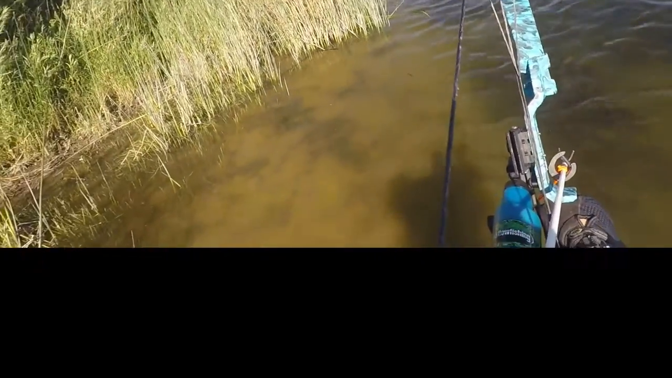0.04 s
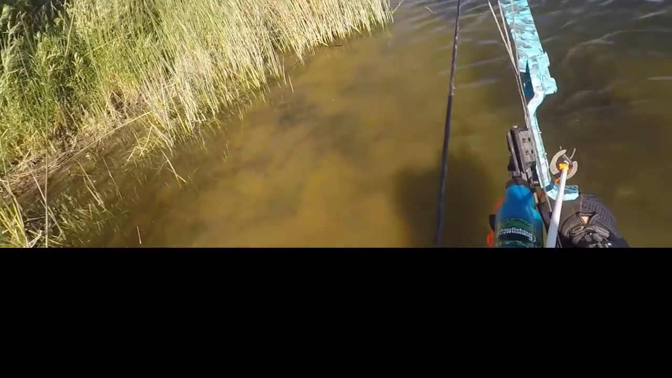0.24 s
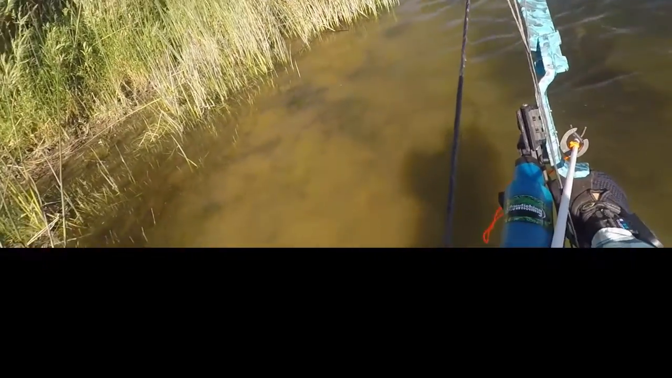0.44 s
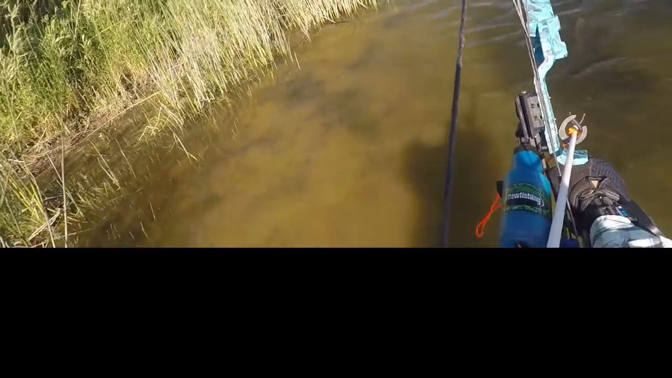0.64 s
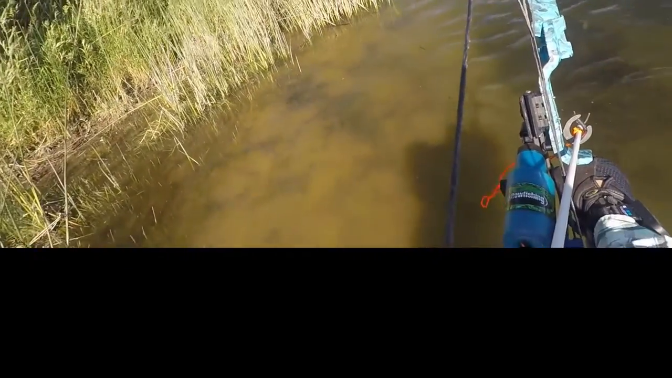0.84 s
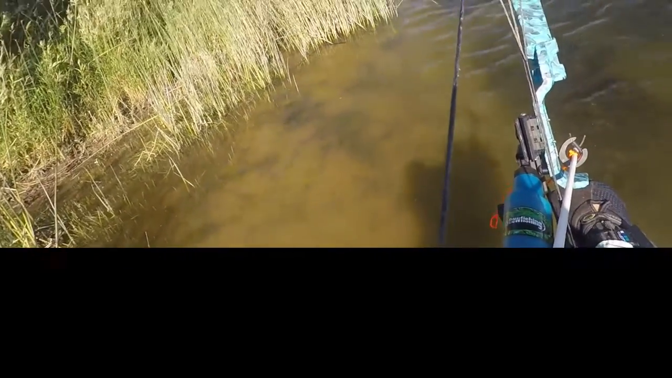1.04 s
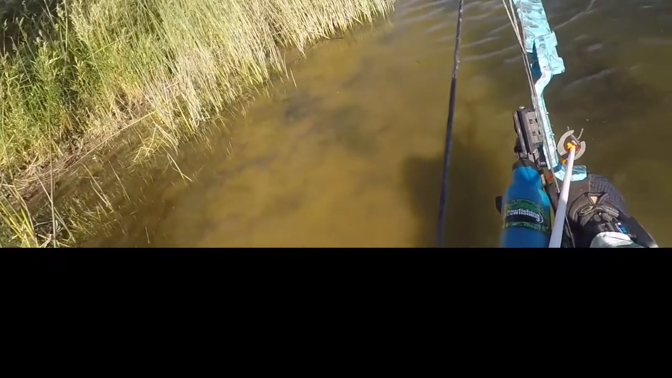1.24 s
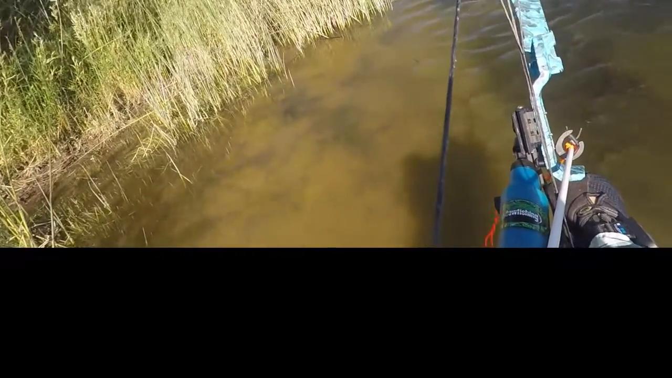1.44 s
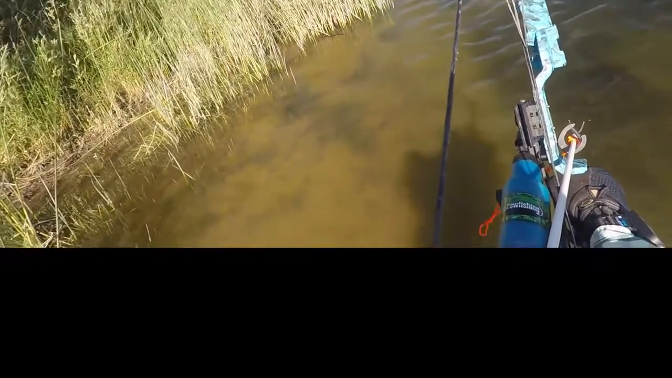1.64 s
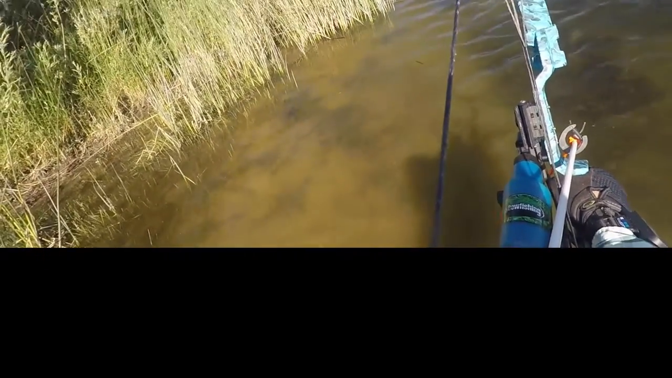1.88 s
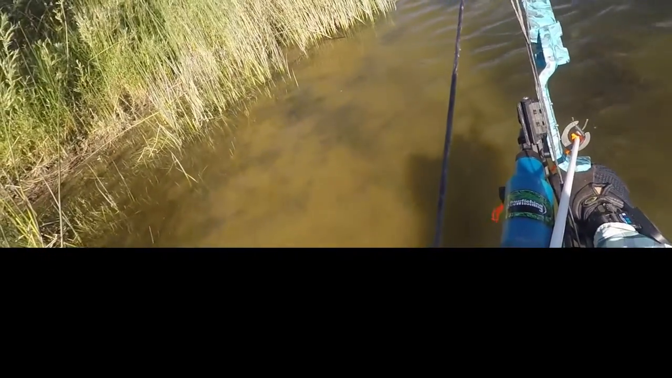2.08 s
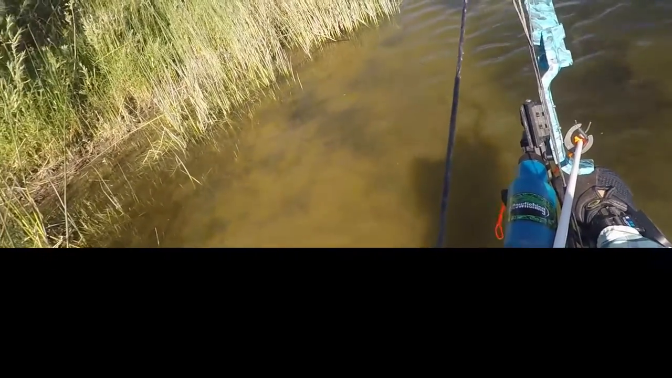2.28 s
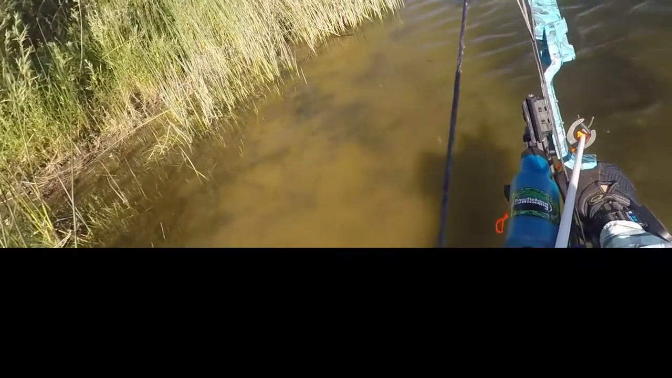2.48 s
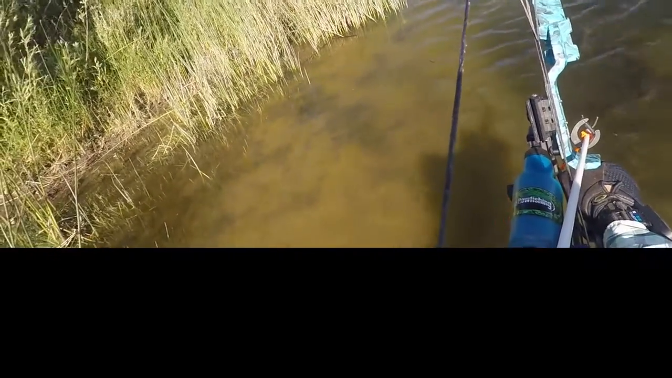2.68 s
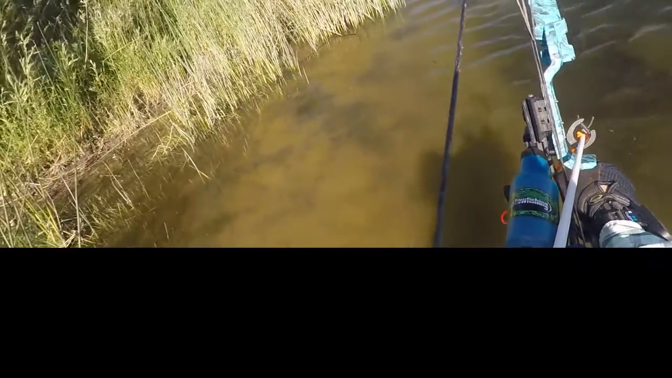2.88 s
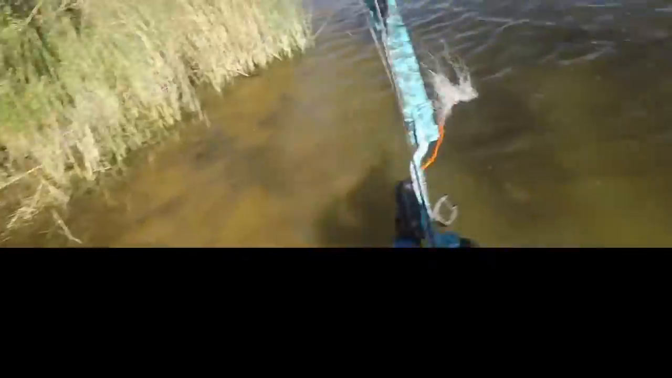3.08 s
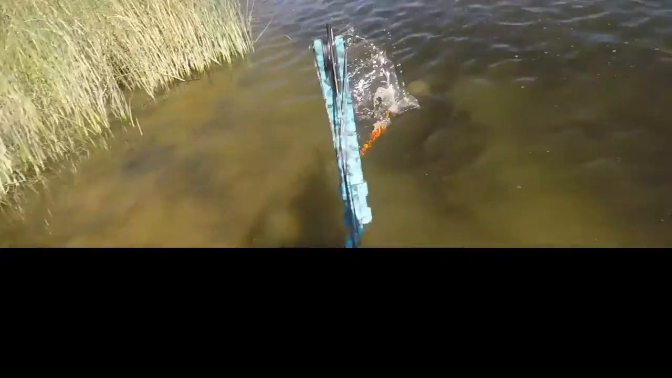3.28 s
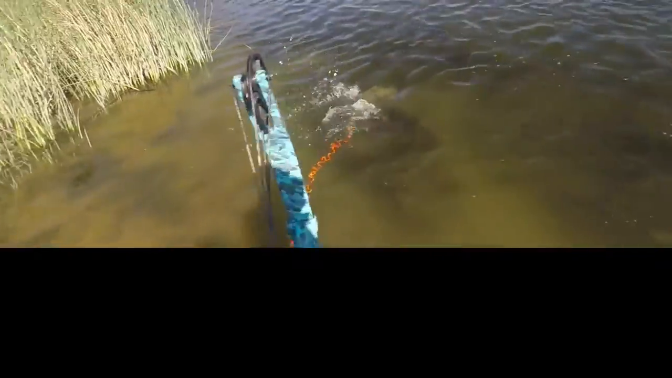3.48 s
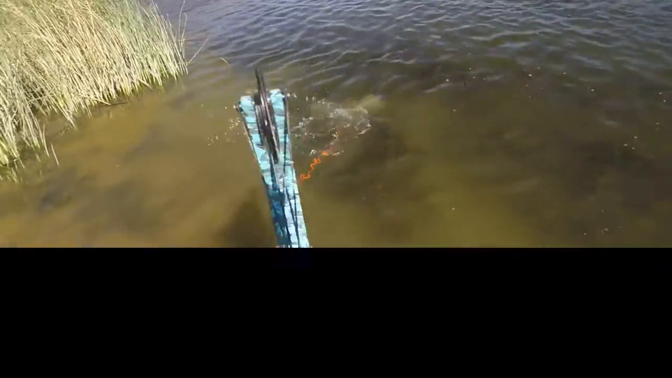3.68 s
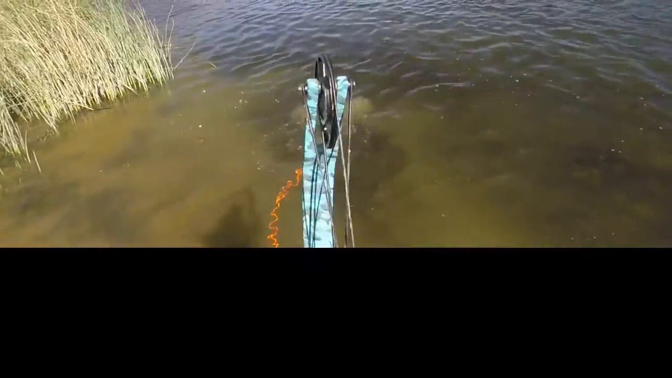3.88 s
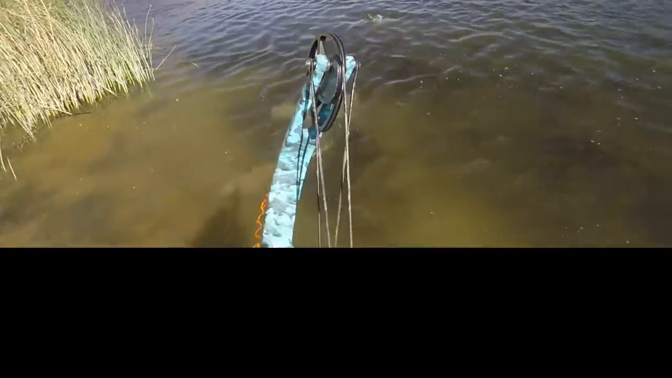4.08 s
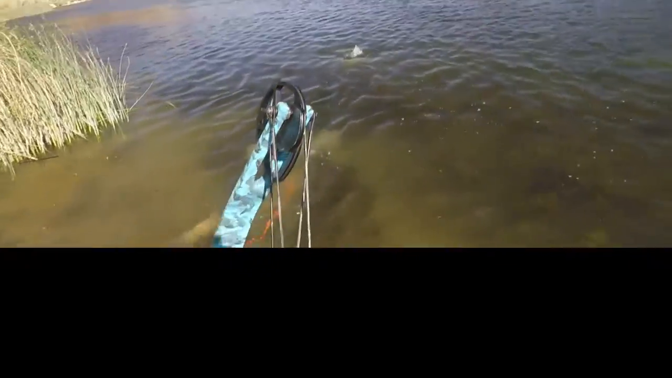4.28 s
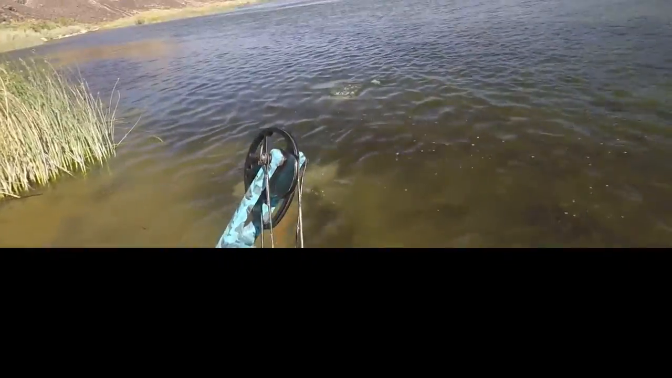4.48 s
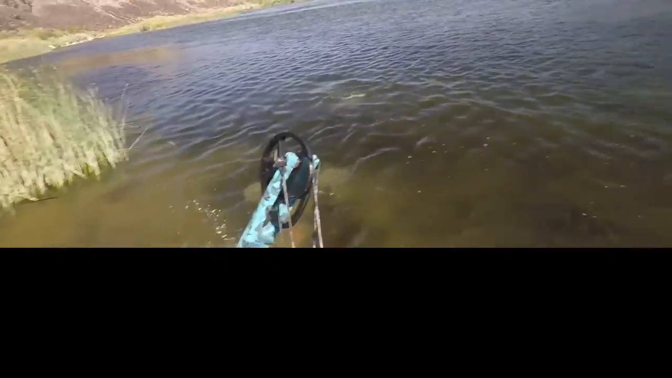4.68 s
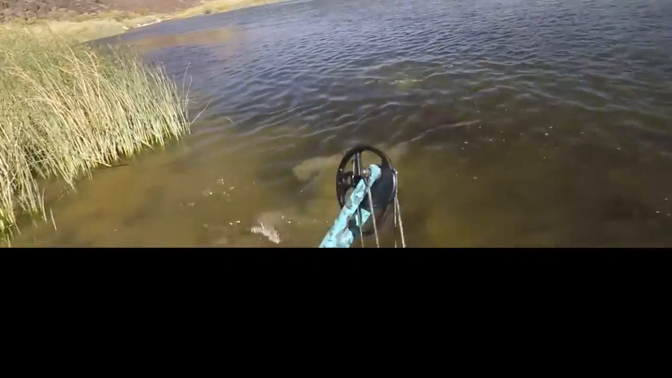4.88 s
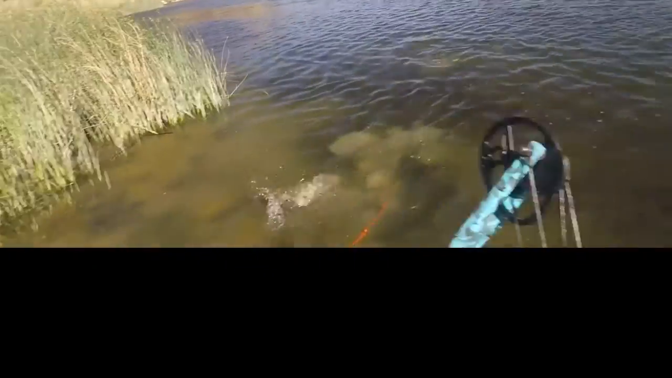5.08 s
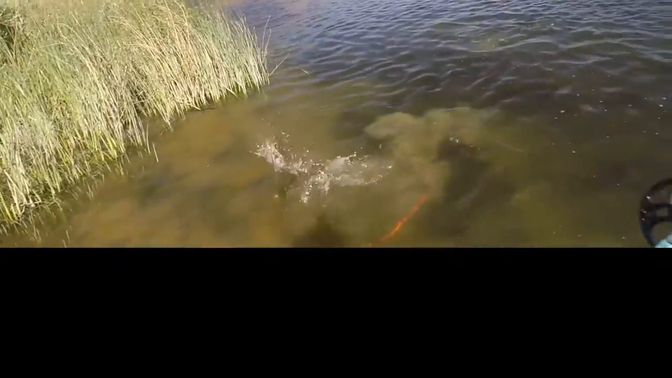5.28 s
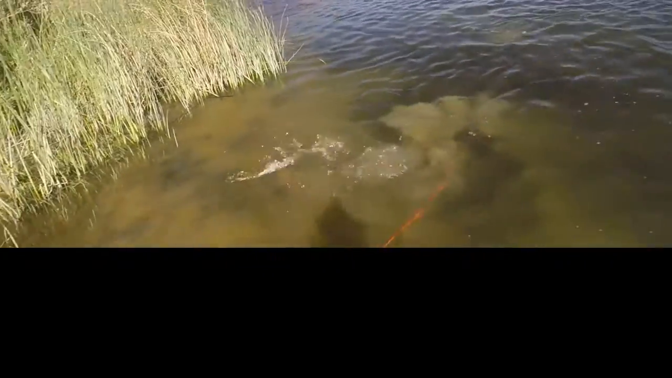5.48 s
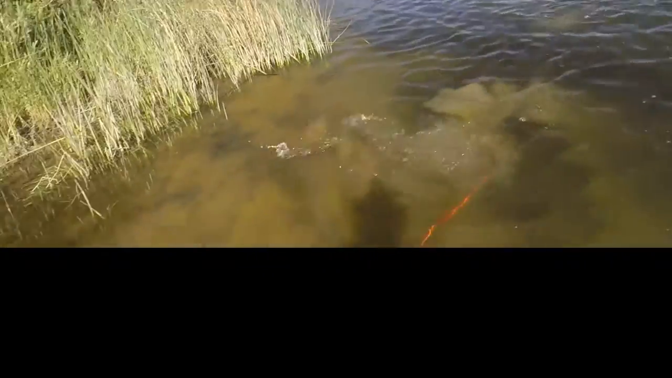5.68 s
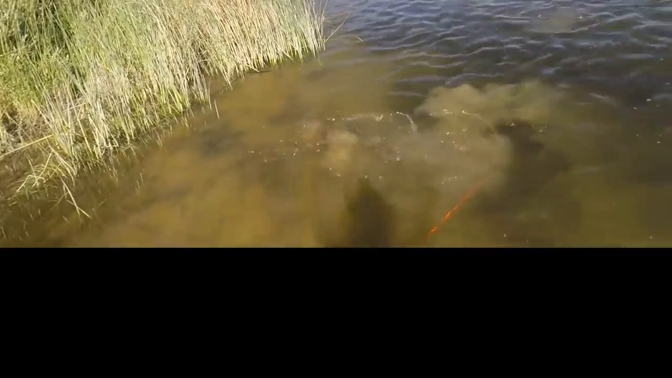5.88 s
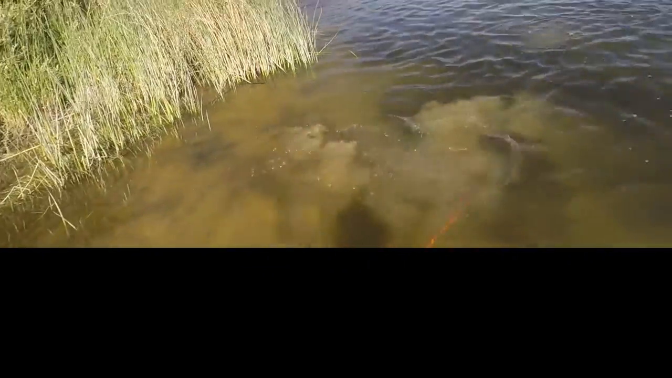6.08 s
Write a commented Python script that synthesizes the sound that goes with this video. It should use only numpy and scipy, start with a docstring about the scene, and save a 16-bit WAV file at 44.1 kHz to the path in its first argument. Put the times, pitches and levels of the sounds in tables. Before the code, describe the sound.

Wind rumbles steadily on a body-worn microphone at a reedy bank, with faint ticks of gear. A small bird chips, whistles a thin note and chatters quietly. Halfway through, a compound bow fires close by with a loud, sharp clack and a deep thump, a brief shudder and a zip of line. Soft splashes and drops follow in the shallows, and the water trickles and laps under the wind.

```python
"""A compound bow is shot into the shallows from a reedy bank, heard from a camera worn by the archer.
Wind rumbles on the microphone throughout, and the archer's gear ticks. From 1.3 s a bird chips,
whistles and chatters in the reeds. At 3 s the string snaps forward: the recoil swings the camera,
line zips out after the arrow, and the bow clacks and shudders. Spray falls back in slaps and drops,
and from 4.5 s the water is churned up near the bank, trickling and lapping to the end."""
import sys
import numpy as np
from scipy import signal
from scipy.fft import rfft, irfft
from scipy.io import wavfile

SR = 44100
rng = np.random.default_rng(int(sys.argv[2]) if len(sys.argv) > 2 else 0)


def inscribe(sig):
    """Save sig as 16-bit PCM at rate SR to the path in sys.argv[1].

    A 1-D sig is mono; a 2-D sig holds one channel per row.
    Samples are clipped to [-1, 1] before scaling.
    """
    pcm = np.round(np.clip(np.atleast_2d(sig).T, -1, 1) * 32767)
    wavfile.write(sys.argv[1], SR, pcm.astype(np.int16))


N = 270814
T = np.arange(N) / SR


def from_db(db):
    return 10 ** (np.asarray(db) / 20)


def rms_one(x):
    return x / np.sqrt(np.mean(x ** 2) + 1e-20)


def phase_of(hz):
    return 2 * np.pi * np.cumsum(hz) / SR


def automation(rows):
    """One curve per column, ramping between timed breakpoints."""
    times, *columns = np.transpose(rows)
    return [np.interp(T, times, column) for column in columns]


def fade(age, t60):
    """A decay that starts at age 0."""
    return (age >= 0) * np.exp(-np.log(1000) * np.clip(age / t60, 0, 10))


def envelope(start_s, attack_s, t60, hold_s=0):
    """A smooth attack, a hold and a decay."""
    rise = np.sin(np.pi / 2 * np.clip((T - start_s) / attack_s, 0, 1)) ** 2
    return rise * fade(np.maximum(T - start_s - attack_s - hold_s, 0), t60)


def drift(rate_hz):
    """A smooth random modulator; rms 1."""
    hz = np.arange(N // 2 + 1) * SR / N
    return rms_one(irfft(rfft(rng.standard_normal(N)) / (1 + (hz / rate_hz) ** 2), N))


def equalise(x, curve):
    """Apply an EQ curve that rolls off beyond its ends; rms 1."""
    hz = np.maximum(np.arange(N // 2 + 1) * SR / N, 1)
    points, db = np.transpose(curve)
    skirts = np.minimum(1, np.minimum(hz / points[0], points[-1] / hz)) ** 3
    gain = from_db(np.interp(np.log(hz), np.log(points), db))
    return rms_one(irfft(rfft(x) * skirts * gain, N))


def noise(curve):
    return equalise(rng.standard_normal(N), curve)


def grains(per_s, spread_db):
    """Random clicks of uneven size."""
    sizes = from_db(spread_db * np.minimum(rng.exponential(1, N), 4))
    return sizes * rng.choice([-1, 1], N) * (rng.random(N) < per_s / SR)


def pole_pair(hz, width_hz):
    r = np.exp(-np.pi * width_hz / SR)
    return np.array([1, -2 * r * np.cos(2 * np.pi * hz / SR), r * r])


def resonance(x, hz, width_hz):
    """A two-pole band-pass with unity gain at its peak."""
    poles = pole_pair(hz, width_hz)
    return signal.lfilter(np.array([1, 0, -1]) * (1 - poles[2]) / 2, poles, x)


def small_hit(start_s, peak_db, hz, t60, breadth, size=16384):
    """A noise burst around one pitch; longer ones also have a softer attack."""
    out, age = np.zeros(N + size), np.arange(size) / SR
    burst = rng.standard_normal(size) * (fade(age, t60) - fade(age, t60 / 10))
    hit = resonance(resonance(burst, hz, breadth * hz), hz, 2 * breadth * hz)
    start = int(start_s * SR)
    out[start:start + size] = from_db(peak_db) * hit / np.abs(hit).max()
    return out[:N]


# resonances of the camera case: f/Hz, width/Hz, boost/dB
CASE_PEAKS = [(920, 87, 7), (1503, 57, 4), (1983, 67, 4.5), (2155, 69, 6.5), (3510, 52, 4.5),
              (4240, 110, 2.5), (5440, 200, 7.5), (6740, 320, 2.5)]

def in_case(x, depth=1):
    """The camera case rings along and colours the sound."""
    return x + depth * sum((from_db(db) - 1) * resonance(x, hz, width) for hz, width, db in CASE_PEAKS)


# wind strength, easing as the archer lowers the bow: t/s, level/dB
WIND_STRENGTH = [(0, 0), (0.9, -1.1), (1.75, -2), (2.4, -1), (3.3, -0.5), (3.65, -4.5), (4.5, -4.5),
                 (5.3, -3), (5.7, -5), (6.14, -3)]
# gusts that buffet the microphone: t/s, boost/dB
GUSTS = [(0.15, 2.5), (1.14, 4.5), (3.3, 11), (3.92, 5.5), (4.8, 9.5)]
# EQ of the deep rumble, the smaller eddies and the airy bed: f/Hz, level/dB
RUMBLE_EQ = [(15, 6.5), (30, 1), (42, -2), (60, -10), (90, -28.5)]
EDDY_EQ = [(60, -3.5), (85, 1), (115, -6.5), (150, -11.5), (240, -14.5), (310, -26.5), (480, -31)]
AIR_EQ = [(200, 3), (480, -0.5), (880, -2), (1120, -3.5), (1500, -1.5), (1750, -4), (2200, -3.5),
          (2500, -7.5), (4000, -9.5), (5500, -12.5), (8000, -16.5), (12000, -17), (15500, -22.5)]

def wind():
    """Lumpy rumble on the microphone over the even rustle of reeds and ripples."""
    strength_db, = automation(WIND_STRENGTH)
    gust_db = sum(db * np.exp(-((T - s) / 0.059) ** 2) for s, db in GUSTS)
    rumble = noise(RUMBLE_EQ) * from_db(-37 + strength_db + gust_db)
    eddies = noise(EDDY_EQ) * from_db(-51.5 + 1.32 * strength_db + 0.083 * gust_db + 1.7 * drift(4.8))
    air = rms_one(in_case(noise(AIR_EQ), depth=0.54))
    low_air = signal.sosfilt(signal.butter(1, 2000, fs=SR, output="sos"), air)
    # the rustle rides the breeze, the top hiss stays level
    rustle = low_air * from_db(-60 + 0.76 * strength_db + 0.74 * drift(23))
    hiss = (air - low_air) * from_db(-62.5)
    return rumble + eddies + rustle + hiss


# dull, close ticks and rubs: t/s, peak level/dB, f/Hz, t60/s
GEAR_TICKS = [(0.04, -51, 790, 0.33), (0.12, -49, 1380, 0.013), (0.529, -51, 1300, 0.017),
              (0.6015, -46, 1150, 0.027), (0.8, -53, 850, 0.18), (0.81, -44.5, 170, .12),
              (1.040, -42, 1310, 0.022), (2.372, -49, 1070, 0.08), (2.973, -45, 816, 0.081),
              (3.68, -55, 514, 0.014), (5.422, -57, 450, 0.01), (5.824, -54.5, 403, 0.011),
              (5.935, -53.5, 402, 0.013)]

def gear():
    """Bow, glove and clothes tick and rub as the archer moves."""
    ticks = sum(small_hit(s, db, hz, t60, breadth=0.41) for s, db, hz, t60 in GEAR_TICKS)
    return in_case(ticks, depth=0.1)


# chips and thin notes: t/s, length/s, first f/Hz, last f/Hz, level/dB, buzz/0-1
BIRD_NOTES = [(1.338, .025, 2900, 3100, -65, 0), (1.575, .022, 2900, 3220, -63, 0),
              (1.766, 0.0098, 2900, 3200, -58.5, 0), (1.893, 0.014, 6900, 5400, -61, 0),
              (2.524, 0.024, 5720, 5640, -58, 0), (2.513, .12, 8650, 8780, -71.5, 0),
              (2.552, 0.016, 3650, 3900, -55, 0.1), (2.557, .034, 3980, 3900, -47.5, 0.17),
              (2.582, .055, 4260, 4330, -59.5, 1), (2.582, .04, 3800, 3700, -59, 1),
              (2.767, 0.06, 7700, 7630, -64.5, 0)]

def bird_chips(buzz_hz=98, swing_hz=160):
    """Short glides from the reeds, some with a buzz that swings level and pitch together."""
    out = np.zeros(N)
    for s, length, first_hz, last_hz, db, buzz in BIRD_NOTES:
        progress = np.linspace(0, 1, int(length * SR))
        flutter = buzz * np.cos(2 * np.pi * buzz_hz * length * progress)
        pitch = first_hz + (last_hz - first_hz) * progress + swing_hz * flutter
        arch = np.sqrt(4 * progress * (1 - progress))
        start = int(s * SR)
        out[start:start + len(arch)] += from_db(db) * arch * (1 + flutter / 2) * np.sin(phase_of(pitch))
    return out


# pitch line of the whistle: t/s, upper voice f/Hz, gap down to the lower voice/Hz
WHISTLE_PITCH = [(1.945, 4120, 720), (1.97, 3960, 428), (2.003, 3953, 198), (2.04, 3950, 285),
                 (2.11, 3984, 323), (2.2, 4000, 312), (2.29, 3970, 343), (2.315, 3910, 300)]

def bird_whistle(start_s=1.94, length_s=0.376, attack_s=0.032, release_s=0.03, sag_db_per_s=7.5):
    """Two voices at once, the lower sliding up into place; their mixing adds a faint tone above."""
    age = T - start_s
    upper_hz, gap_hz = automation(WHISTLE_PITCH)
    upper = phase_of(upper_hz + 9 * drift(60))
    beat = phase_of(gap_hz + 14 * drift(40))
    voices = np.sin(upper) + from_db(-6.5) * np.sin(upper - beat) - from_db(-20) * np.sin(upper + beat)
    attack = np.clip(age / attack_s, 0, 1) ** 2
    release = np.clip((length_s - age) / release_s, 0, 1)
    return from_db(-50.5 - sag_db_per_s * age + 0.73 * drift(40)) * attack * release * voices


def bird_chatter(start_s=2.875, gap_s=0.047):
    """A dry run of evenly spaced, raspy notes."""
    times = start_s + gap_s * np.arange(15)
    return sum(small_hit(s, peak_db=-52, hz=3890, t60=0.093, breadth=0.13) for s in times)


def recoil(start_s=2.9855, swing_hz=31.9):
    """The recoil swings arm and camera: a few cycles of sub, more felt than heard."""
    swing = np.sin(2 * np.pi * swing_hz * (T - start_s))
    return from_db(-14) * envelope(start_s, attack_s=0.05, t60=0.34, hold_s=0.0234) * swing


# bright EQ of the line's zip, shared by the bow's crack: f/Hz, level/dB
BRIGHT_EQ = [(1500, 3.5), (3000, -7), (3600, 1.5), (4700, 0), (5500, -0.5), (6800, -0.5), (7800, -8),
             (10000, -8), (12000, -9), (15500, -17)]

def line():
    """A grainy zip: the arrow speeds up over its rest, then the line pays out ever more slowly."""
    zip_grains = equalise(grains(per_s=7100, spread_db=5), BRIGHT_EQ)
    return from_db(-35) * envelope(2.996, attack_s=0.05, t60=0.22) * rms_one(in_case(zip_grains))


def strike(times, levels_db, modes, uneven_db=0.8):
    """Each contact sets every mode ringing with a strength of its own."""
    out = np.zeros(N)
    for hz, db, t60 in modes:
        clicks = np.full(N, 1e-18)
        scatter_db = uneven_db * rng.standard_normal(len(times))
        clicks[np.round(times * SR).astype(int)] = from_db(levels_db + db + scatter_db)
        r, w = np.exp(-np.log(1000) / (t60 * SR)), 2 * np.pi * hz / SR
        out += signal.lfilter([0, np.sin(w)], [1, -2 * r * np.cos(w), r * r], clicks)
    return out


def disperse(x, hz, width_hz):
    """Bending waves near hz arrive late, smearing a blow over a millisecond or two."""
    poles = pole_pair(hz, width_hz)
    return signal.lfilter(poles[::-1], poles, x)


def bursts(times, levels_db, t60):
    """The summed envelope of sudden, dying bursts."""
    return sum(from_db(db) * fade(T - s, t60) for s, db in zip(times, levels_db))


# hits of string, cams, arrow and stop, with a send to each layer: t/s, thud/dB, clack/dB, crack/dB
BOW_CONTACTS = [(3.0050, -38, -58, -38.5), (3.0165, -46, -56, -33), (3.0216, -25.5, -38, -56),
                (3.0265, -26.5, -37, -25), (3.0346, -26.5, -25, -53), (3.0368, -27, -45, -25),
                (3.039, -21.5, -15.5, -29), (3.0497, -24, -12.5, -30), (3.1028, -67, -42, -37),
                (3.1078, -41, -35, -31)]
# low modes of limbs and string: f/Hz, level/dB, t60/s
LIMB_MODES = [(89, -5, 0.069), (121, -11, 0.059), (210, -7, 0.035), (352, -21, 0.032), (505, -15, 0.014),
              (710, -4, 0.014), (750, -17, 0.024), (910, -21.5, 0.058)]
# hard modes of the riser and its fittings: f/Hz, level/dB, t60/s
RISER_MODES = [(1420, -24, 0.0044), (1610, -16, 0.028), (1840, -17.5, 0.043), (1926, -10.5, 0.025),
               (2080, -21, 0.05), (2180, -17, 0.058), (2270, -4.5, 0.013), (2610, -15.5, 0.025)]
# EQ of the buzzing tail: f/Hz, level/dB
SHUDDER_EQ = [(200, -9), (500, -7), (900, -10.5), (1100, -13), (1600, -3), (2200, -1), (2600, -0.5),
              (3000, -12), (5000, -10), (9000, -21)]

def bow():
    """String and cams beat on the limbs, the string hits its stop, and the fittings go on buzzing."""
    times, thud_db, clack_db, crack_db = np.transpose(list(BOW_CONTACTS) + rattle(count=5))
    thud = strike(times, thud_db, LIMB_MODES)
    riser = disperse(strike(times, clack_db, RISER_MODES), hz=2000, width_hz=1000)
    clack = resonance(riser, hz=2030, width_hz=1500)   # the riser radiates best in the upper mids
    crack = rms_one(in_case(noise(BRIGHT_EQ))) * bursts(times, crack_db - 3, t60=0.022)
    buzz = equalise(grains(per_s=3500, spread_db=1), SHUDDER_EQ)
    shudder = rms_one(in_case(buzz)) * bursts(times, clack_db - 30, t60=0.33)
    return thud + clack + crack + shudder


def rattle(count, start_s=3.031, gap_s=0.0075, jitter_s=0.000915):
    """Loose fittings rattle as the limbs spring forward: extra rows for BOW_CONTACTS."""
    times = start_s + gap_s * np.arange(count) + jitter_s * rng.standard_normal(count)
    return [(s, -30.5, -38, -34) for s in times]


def plunge(peak_s=3.27, swell_s=0.27):
    """The arrow's hole in the water closes with a dull gurgle."""
    gurgle = rms_one(resonance(grains(per_s=1100, spread_db=6), hz=1300, width_hz=960))
    return in_case(from_db(-64.5) * gurgle * np.exp(-((T - peak_s) / swell_s) ** 2))


# spray falls back, then the water is churned by the bank: t/s, attack/s, level/dB, t60/s
SPLASHES = [(3.13, 0.066, -61, 0.59), (3.285, 0.029, -64, 0.7), (3.425, 0.023, -61, 1),
            (4.515, 0.03, -61.5, 0.34), (4.9, 0.18, -67, 0.75), (5.11, 0.14, -62, .9),
            (5.5, 0.038, -66, .35)]
# EQ of the patter: f/Hz, level/dB
SPRAY_EQ = [(500, -25), (900, -2.5), (1400, -3), (2100, -2), (2700, -0.5), (3200, -4), (4100, 2.5),
            (5000, -7.5), (5600, -4.5), (6400, -13), (7500, -6.5), (10000, -14), (15000, -16)]

def spray():
    """Tiny drops patter down in clumps with each splash, and the stirred water goes on trickling."""
    spatter = grains(per_s=900, spread_db=3.5) + 0.45 * grains(per_s=3500, spread_db=2.5)
    # droplets trap bubbles that ring for about ten cycles, each at its own pitch
    bubbles = sum(resonance(grains(per_s=25, spread_db=3.5), hz, hz / 14) / hz ** 0.5
                  for hz in np.geomspace(1500, 8000, 16))
    droplets = equalise(rms_one(spatter) + 0.5 * rms_one(bubbles), SPRAY_EQ)
    patter = rms_one(in_case(droplets, depth=1.5))
    splashes = sum(from_db(db) * envelope(s, attack_s, t60) for s, attack_s, db, t60 in SPLASHES)
    trickle = from_db(-68) * envelope(3.74, attack_s=1.92, t60=3.8)
    clumps = from_db(3 * drift(40))
    return patter * (splashes + trickle) * clumps


# midrange accents in the splashes: t/s, peak level/dB, f/Hz
WATER_SLAPS = [(3.18, -50, 2020), (3.295, -49, 1350), (3.349, -49, 1500), (3.956, -52.5, 1400),
               (5.199, -56, 1870), (5.3, -50, 2080), (5.525, -52, 2180), (5.552, -50, 2930),
               (5.574, -54, 2170)]

def slaps():
    """Heavy slaps of water, each a broad burst with a short tail."""
    return in_case(sum(small_hit(s, db, hz, t60=0.13, breadth=0.39) for s, db, hz in WATER_SLAPS))


# bright plinks on top: t/s, peak level/dB, f/Hz
WATER_DROPS = [(3.327, -52.5, 6050), (3.697, -52.5, 5570), (4.042, -53, 2380), (4.372, -52.5, 3650),
               (4.685, -55, 6500), (4.836, -53, 4230), (5.057, -49.5, 3700), (5.088, -46, 4130),
               (5.235, -57, 4040), (5.298, -45, 4100), (5.379, -43, 3960), (5.439, -52, 3700)]

def drops():
    """Larger single drops land and stand out of the patter."""
    return in_case(sum(small_hit(s, db, hz, t60=0.023, breadth=0.25) for s, db, hz in WATER_DROPS))


def lapping():
    """The stirred water laps on in a soft, narrow band of grains."""
    ripples = rms_one(resonance(grains(per_s=440, spread_db=3.5), hz=1520, width_hz=170))
    return from_db(-70) * envelope(3.7, attack_s=0.12, t60=10) * ripples


def scene():
    """The mono mix of shot, water, gear, birds and wind."""
    shot = bow() + recoil() + line()
    water = spray() + plunge() + lapping() + slaps() + drops()
    return (shot + water + gear() + bird_chips() + bird_whistle() + bird_chatter() + wind())[None]


def record(dry):
    """A steep high cut takes off the very top."""
    cutoff_hz = 15450
    return signal.sosfilt(signal.ellip(12, 0.1, 90, cutoff_hz, fs=SR, output="sos"), dry)


dry = scene()
out = record(dry)
inscribe(out)
```